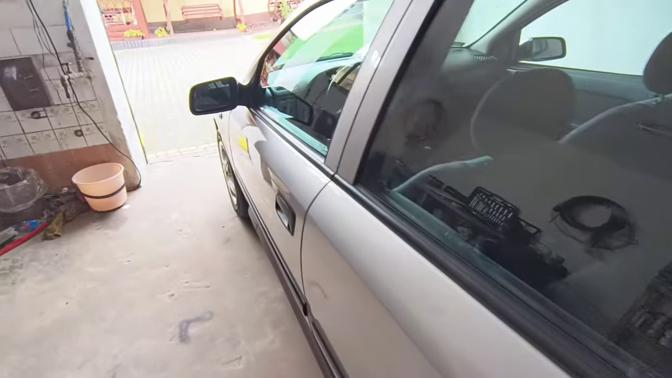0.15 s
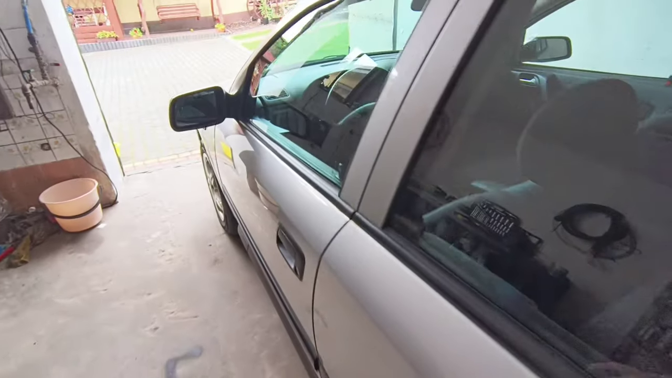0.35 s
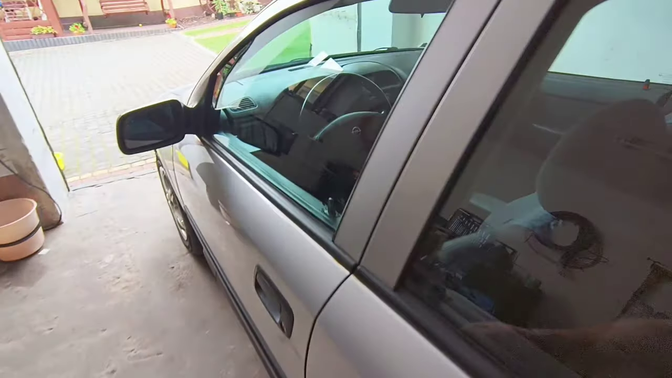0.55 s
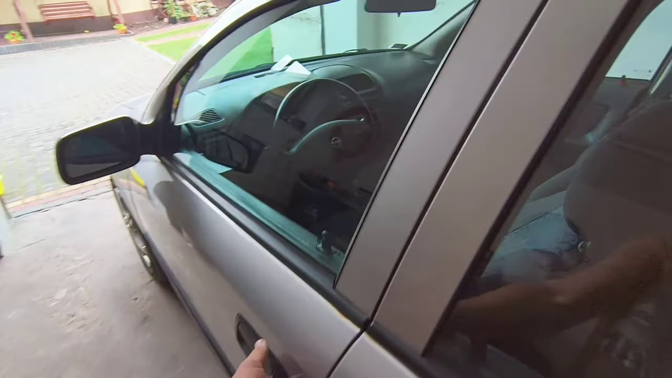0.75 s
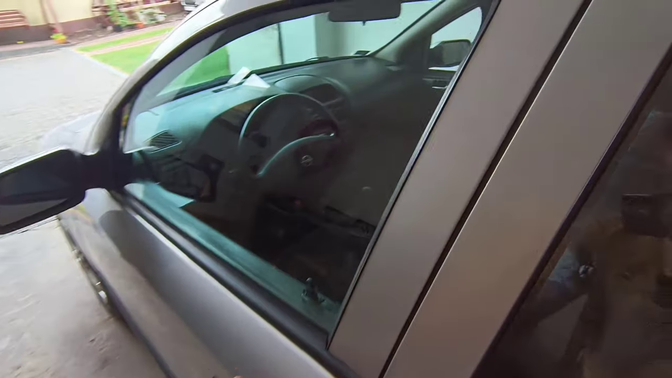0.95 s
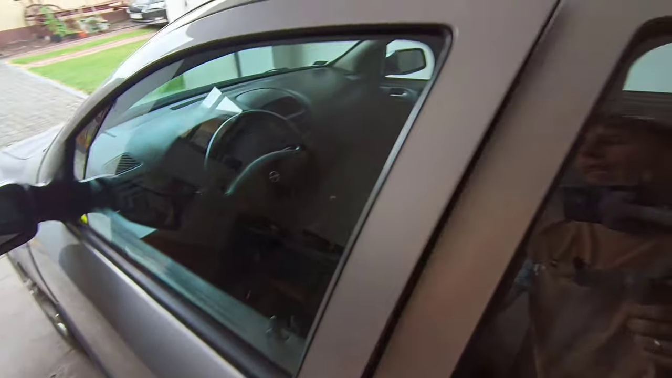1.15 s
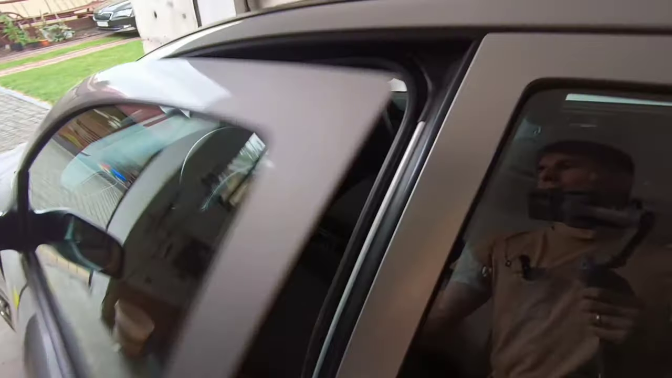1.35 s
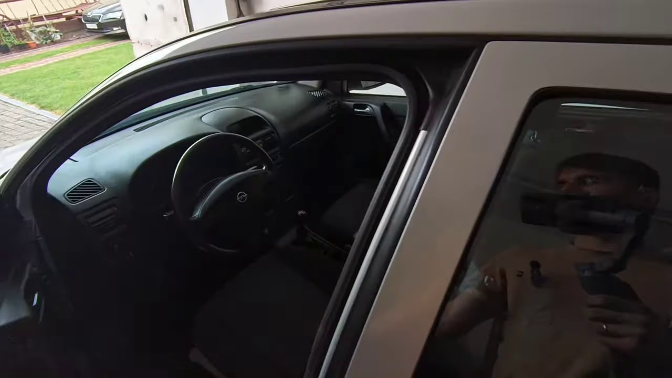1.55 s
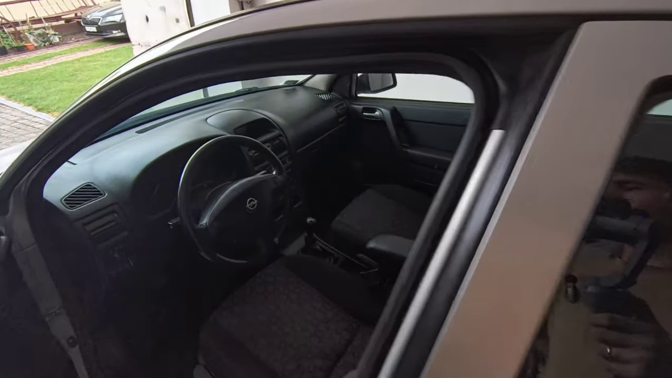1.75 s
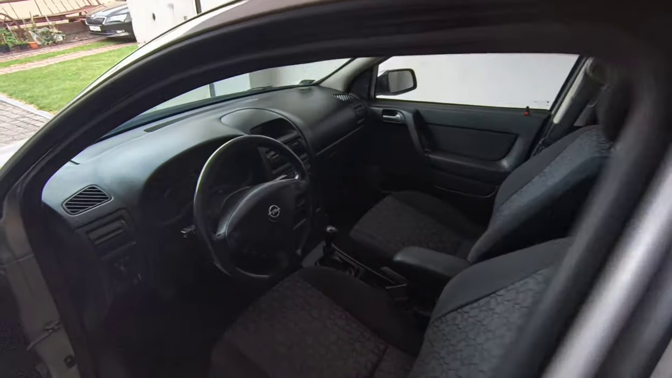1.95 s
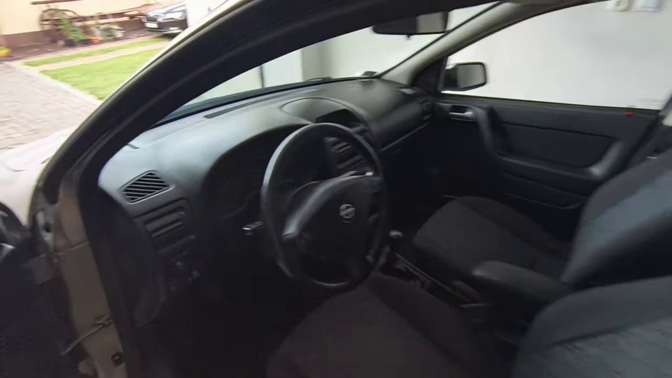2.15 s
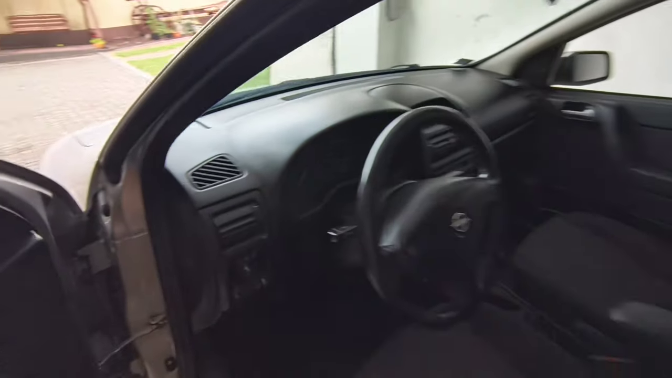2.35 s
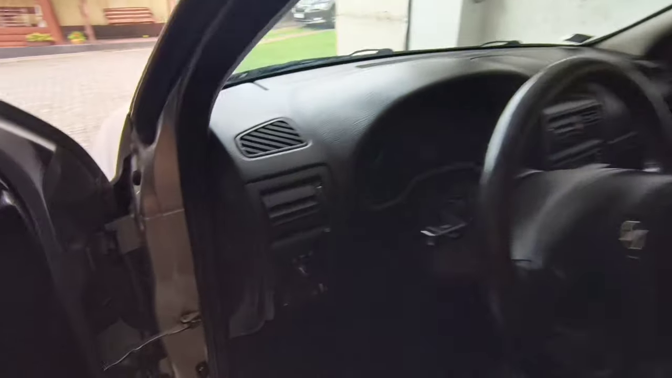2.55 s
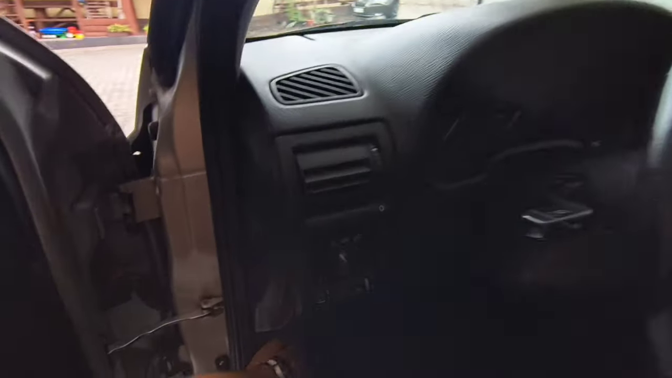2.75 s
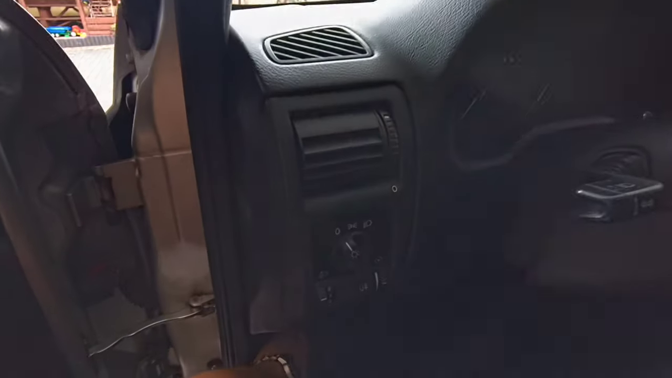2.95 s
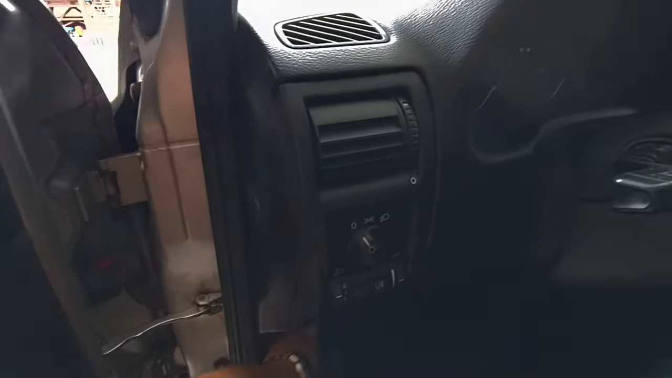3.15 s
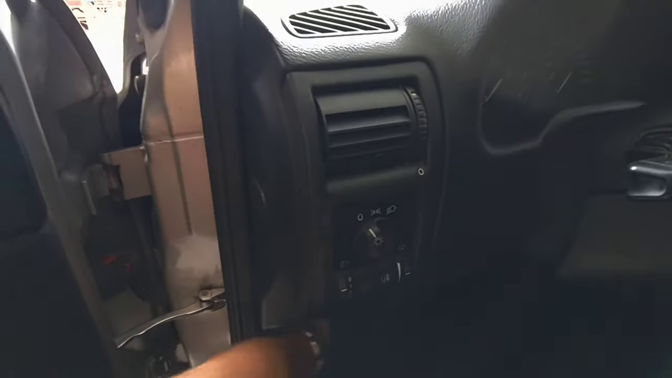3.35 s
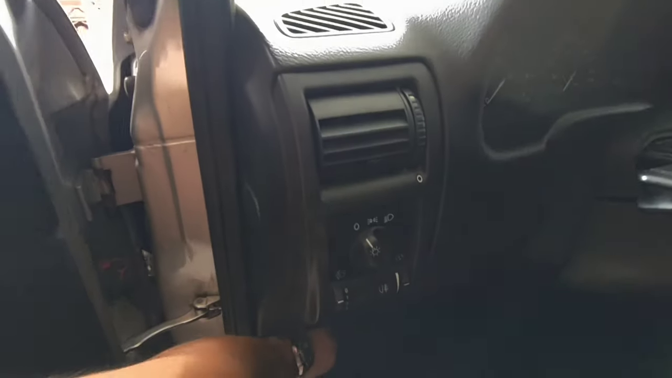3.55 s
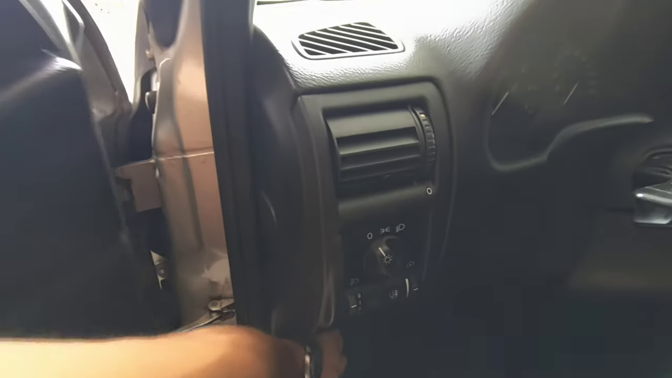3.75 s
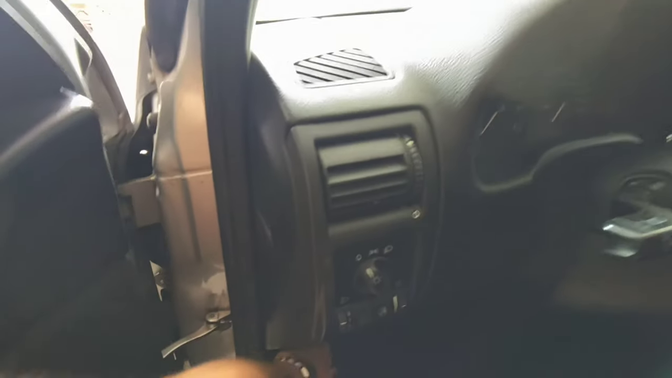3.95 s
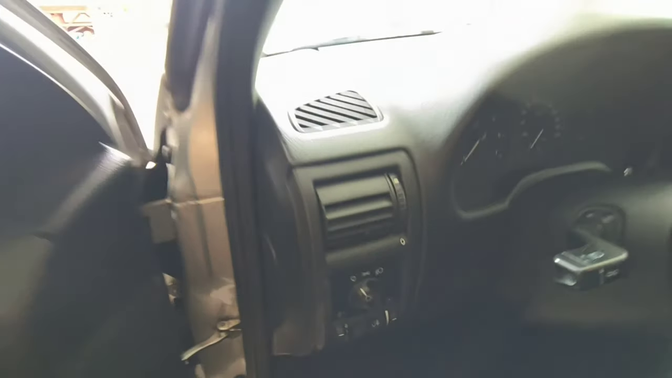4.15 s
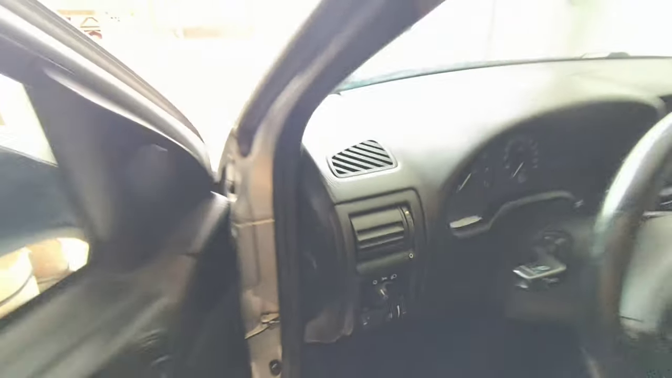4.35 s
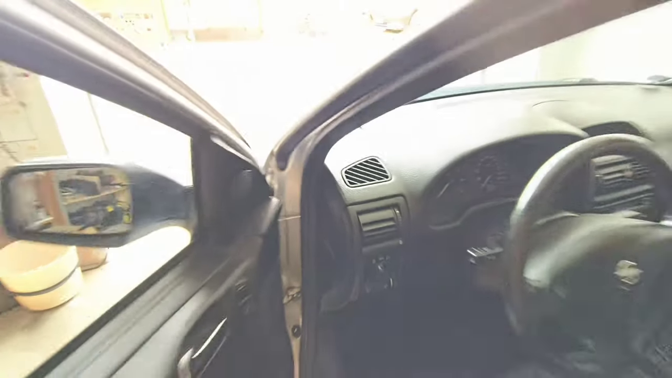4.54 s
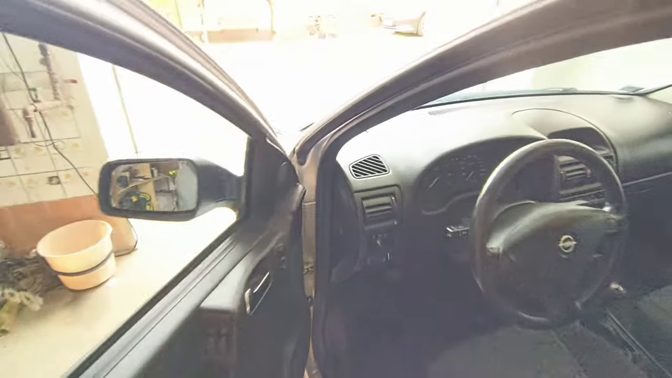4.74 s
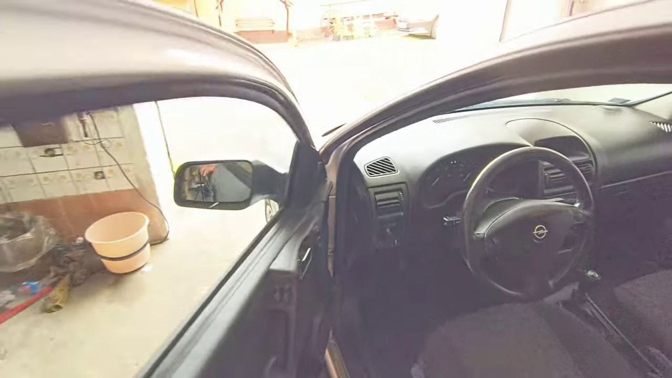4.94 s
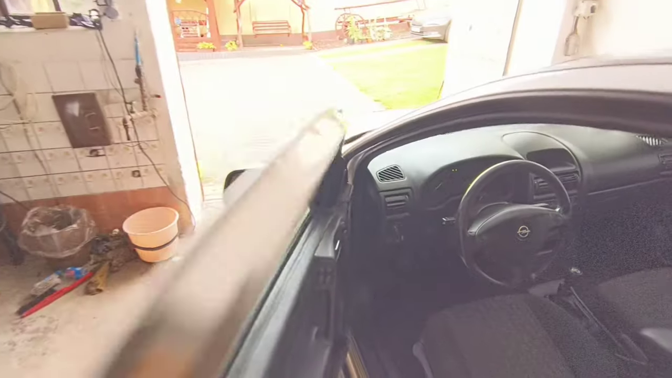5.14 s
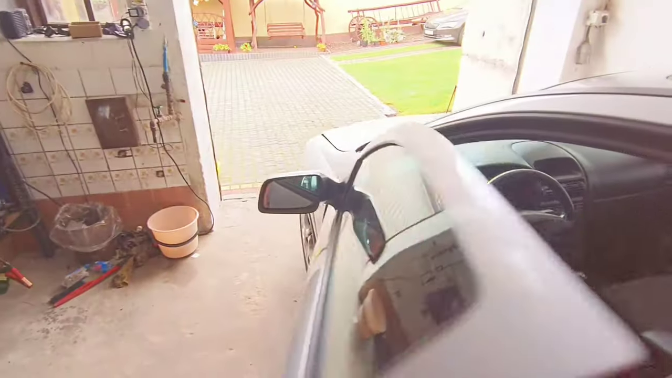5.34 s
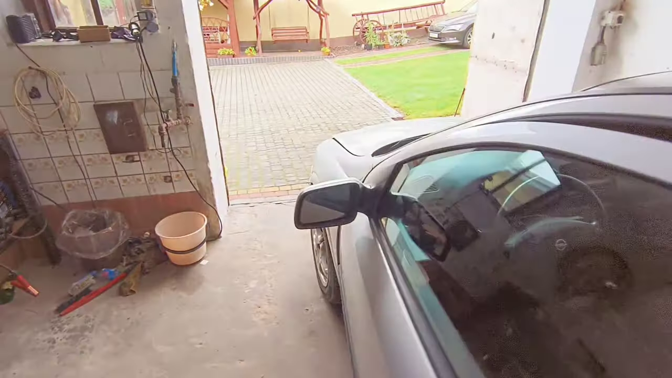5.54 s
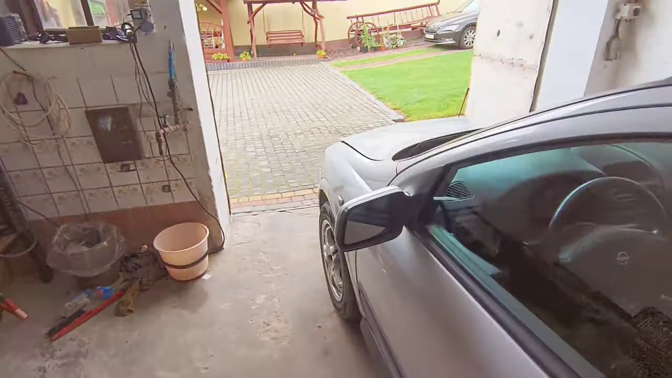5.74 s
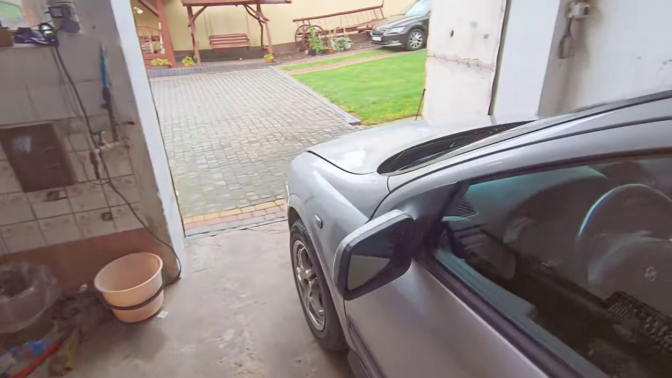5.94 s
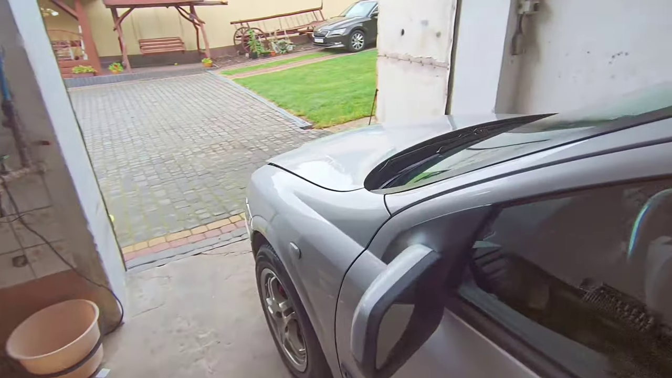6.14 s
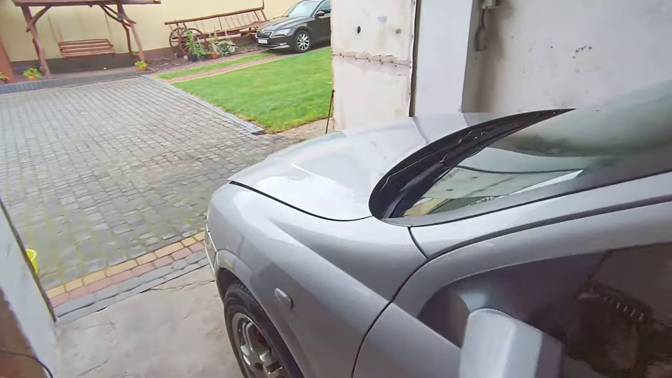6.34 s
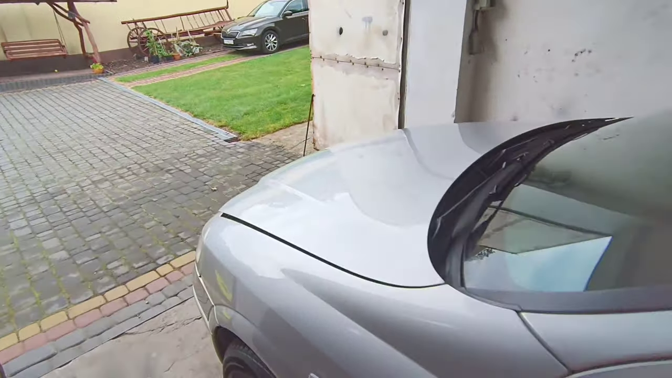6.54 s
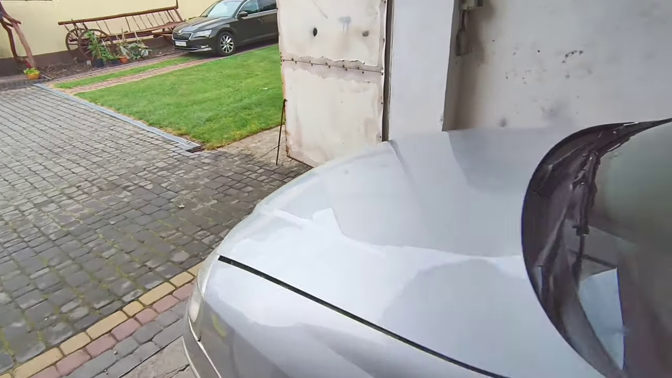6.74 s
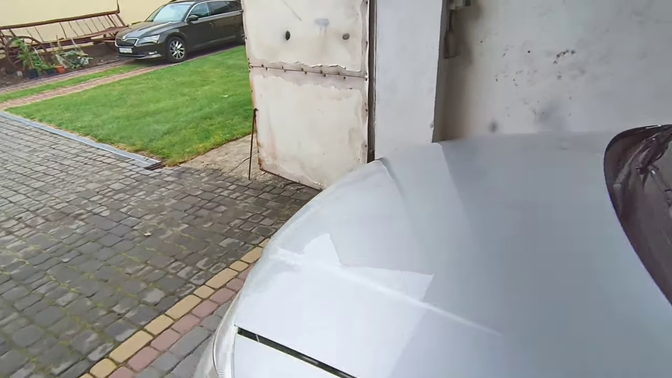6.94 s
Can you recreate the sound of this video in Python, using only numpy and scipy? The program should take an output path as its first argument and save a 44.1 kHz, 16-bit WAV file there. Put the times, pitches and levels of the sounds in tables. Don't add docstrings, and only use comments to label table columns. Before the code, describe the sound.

Close handheld sound of a car door opening, a groaning bonnet release lever, a heavy metallic pop, cloth rustle, and one hard door slam.

```python
import sys
import numpy as np
from scipy import signal
from scipy.io import wavfile

SR = 44100
rng = np.random.default_rng(int(sys.argv[2]) if len(sys.argv) > 2 else 0)


def log_audio(samples):
    frames = np.atleast_2d(samples).T
    limited = np.clip(frames, -1, 1)
    pcm = np.round(limited * 32767).astype(np.int16)
    wavfile.write(sys.argv[1], SR, pcm)


def level_to_linear(level):
    exponent = np.asarray(level, float) / 20
    return 10 ** exponent


N = 308341
TIME = np.arange(N) / SR
EDGES = np.minimum(22 * 2 ** np.arange(0, 9.8, .4), 17000)
CENTRES = np.sqrt(EDGES[1:] * EDGES[:-1])


def unit_rms(x):
    return x / np.sqrt(np.mean(x ** 2) + 1e-20)


def in_time(rows):
    s, *columns = np.transpose(rows)
    return [np.interp(TIME, s, column) for column in columns]


def at_hz(points, hz):
    points = np.array(points)
    return np.interp(np.log(hz), np.log(points[:, 0]), points[:, 1])


def band(x, k):
    return signal.sosfilt(signal.butter(2, EDGES[k:k + 2], "band", fs=SR, output="sos"), x)


def drift(rate_hz):
    r = np.exp(-20 * np.pi * rate_hz / SR)
    slow = signal.lfilter([1], [1, -2 * r, r * r], rng.standard_normal(N // 10 + 4002))[4000:]
    return np.interp(np.arange(N) / 10, np.arange(len(slow)), unit_rms(slow))


def dying(t60):
    t60 = max(t60, .004)
    return level_to_linear(-60 * np.arange(int(t60 * SR * 4 / 3)) / (t60 * SR))


def mix_in(track, sound, at):
    track[at:at + len(sound)] += sound[:N - at]


def coloured(spectrum, patchy_db, flicker_hz):
    white, together = rng.standard_normal((2, N)), drift(flicker_hz)
    out = np.zeros(N)
    for k, hz in enumerate(CENTRES):
        if spectrum[0][0] < hz < spectrum[-1][0]:
            level_db = at_hz(spectrum, hz) + patchy_db * (together + drift(19))
            out += level_to_linear(level_db) * band(white[k % 2], k)
    return unit_rms(out)


def swells(rows, still_db):
    power = level_to_linear(still_db) ** 2
    for s, peak_db, swell, fade in rows:
        away = np.where(TIME < s, (s - TIME) / max(swell, .01), (TIME - s) / max(fade, .01))
        power = power + level_to_linear(peak_db - 22.5 * np.minimum(away, 8)) ** 2
    return np.sqrt(power)


def friction(rows, slips_per_s, width_hz):
    hz, level_db = in_time(rows)
    slips = (rng.random(N) < slips_per_s / SR) * rng.standard_normal(N)
    r = np.exp(-np.pi * width_hz / SR)
    turn = np.exp(2j * np.pi * np.cumsum(hz) / SR)
    ring = np.real(turn * signal.lfilter([1], [1, -2 * r, r * r], slips / turn))
    to_nearer_end = np.minimum(TIME - rows[0][0], rows[-1][0] - TIME)
    sounding = np.clip(to_nearer_end / 0.018, 0, 1)
    return level_to_linear(level_db - 2.0) * sounding * unit_rms(ring)


def panels(blows):
    out = np.zeros(N)
    for s, blow_db, shaking, modes in blows:
        burst = dying(shaking)[:SR // 2]
        white = rng.standard_normal((len(modes), SR // 2))[:, :len(burst)]
        rattle = white * burst / np.sqrt(shaking * 10)
        for shake, (hz, mode_db, t60) in zip(rattle, modes):
            force = np.full(SR * 3 // 2, 1e-18)
            quick = hz / (hz + 95.0)
            force[:len(shake)] += quick * shake
            force[0] += 29.0 * (1 - quick) ** 2
            r, w = level_to_linear(-60 / (min(t60, 1.5) * SR)), 2 * np.pi * hz / SR
            ring = signal.lfilter([0, np.sin(w)], [1, -2 * r * np.cos(w), r * r], force)
            mix_in(out, level_to_linear(blow_db + mode_db) * ring, round(s * SR))
    return out


# (frequency [Hz], level [dB])
FLOOR = [(15, -30), (25, -1), (660, -12.5), (1020, -19), (1400, -23), (5280, -33.5), (10400, -25.5),
         (16000, -57)]


def quiet_garage():
    return level_to_linear(-58) * coloured(FLOOR, 0.58, 0.64)


# (frequency [Hz], T60 [s])
GARAGE_T60 = [(60, 0.71), (300, 0.41), (1500, 0.37), (6000, 0.43), (15000, 0.3)]


def garage_echoes(x):
    t, white = np.arange(SR) / SR, rng.standard_normal(SR)
    echoes = np.zeros(SR)
    for k, hz in enumerate(CENTRES):
        t60 = max(at_hz(GARAGE_T60, hz), .05)
        echoes += band(white, k) * level_to_linear(-3.0 * np.log2(1 + hz / 1000) - 60 * t / t60)
    echoes *= np.clip(t / 0.0084, 0, 1)
    return signal.fftconvolve(x, echoes / np.sqrt(np.sum(echoes ** 2)))[:N]


# (frequency [Hz], level [dB per Hz])
RUMBLE = [(20, 8), (35, -1), (80, -1.5), (160, -15.5), (300, -34.5), (600, -53)]
# (time [s], level [dB], swell [s], fade [s])
HANDLING = [
    (.33, -51, .4, 0.4),
    (.93, -50, 0.18, 0.6),
    (1.3, -35, 0.45, 0.27),
    (2.85, -36, 0.2, 0.32),
    (4.05, -39.5, 0.49, 0.59),
    (4.44, -39, 0.14, 0.18),
    (4.85, -45, 0.52, 0.57),
    (5.95, -40.5, 0.23, 0.97),
    (6.45, -51, .4, 0.14),
]


def microphone_grip():
    return swells(HANDLING, -61) * coloured(RUMBLE, 1.36, 9.0)


# (frequency [Hz], level [dB per Hz])
FABRIC = [(6000, -30), (9000, -17), (12000, -3.5), (14300, 4), (17000, -7)]
# (time [s], level [dB], swell [s], fade [s])
SLIDES = [(5.2, -44, .3, 0.48), (5.1, -45.5, 0.75, .6), (4.86, -41.5, .6, 0.83), (4.95, -43.5, .5, .7),
          (5.4, -56.5, .5, 0.31), (7.1, -48, .3, 0.15), (0.93, -48, .3, 0.22), (8.3, -50, 0.25, .3),
          (1.66, -45, .08, 0.11)]


def sliding_fabric():
    return swells(SLIDES, -90.0) * coloured(FABRIC, .6, 9.0)


# (frequency [Hz], level [dB per Hz])
SHUFFLE = [(150, -10), (300, -1), (600, -11.5), (1300, 2), (2500, -6), (4000, -7.5), (8000, -16)]
CLOTH = [(2000, -4), (4000, -10.5), (7000, -12), (10000, -5), (13000, -8), (16500, 2)]
# (time [s], level [dB], swell [s], fade [s], cloth share [dB])
GESTURES = [(.33, -60.5, 0.56, 0.35, 6), (.74, -52.5, 0.16, 0.35, -30), (.93, -52, 0.34, 0.24, 3),
            (1.3, -47.5, 0.22, 0.13, -7), (1.67, -37, 0.056, 0.11, 3), (1.93, -53, 0.82, 0.16, -7),
            (2.45, -61.5, 1, 0.55, 1.5), (2.9, -52, 0.43, 0.26, 3.5), (3.45, -49.5, 0.35, 0.8, -2.5),
            (3.93, -29.5, 0.14, 0.14, 1), (4.439, -61.5, 0.51, 0.26, 8), (4.75, -56, 0.6, .4, 9),
            (4.959, -43.5, 0.16, 0.15, 10), (5.45, -51.5, 0.51, 0.15, 4), (5.86, -27.5, 0.041, 0.13, -17),
            (6.39, -47, 0.3, 0.31, 4), (6.99, -49, 0.44, 0.36, 2)]


def moving_person():
    shuffle = swells([row[:-1] for row in GESTURES], -62.5) * coloured(SHUFFLE, 2.38, 4.4)
    sleeve = [(s, peak_db + cloth_db, swell, fade) for s, peak_db, swell, fade, cloth_db in GESTURES]
    rustle = swells(sleeve, -75) * coloured(CLOTH, 1.2, 40.)
    crackle = level_to_linear(3 * drift(107) - 2.0)
    return shuffle * crackle + rustle


# (frequency [Hz], level [dB], T60 [s])
CABIN = [(13.16, -7.5, 1.8), (34.8, -5, 1.38), (78.5, -11, 0.54), (150, -15, 0.4)]
ENGINE_BAY = [(58.4, -13, 0.93), (87.9, 3, 0.79)]
CABIN_HIGH = [(157, 3.5, 0.74), (74, -16, .3)]
BONNET_LOW = [(91.9, -2, 0.42), (118, -6, .2), (165, -2, .3), (193, 4, 0.45), (272.7, -6, 0.28),
              (360, -7, 0.18)]
SEAT = [(84, -7.5, 0.079), (136, -9, 0.1)]
# (time [s], level [dB], shaking T60 [s], cavity)
BOOMS = [
    (5.845, -33, 0.056, CABIN),
    (3.92, -29.5, 0.052, ENGINE_BAY),
]
# (time [s], level [dB], shaking T60 [s], panel)
REBOUNDS = [
    (3.91, -33, .1, BONNET_LOW),
    (4.005, -35.5, 0.082, BONNET_LOW),
    (5.846, -30, .03, CABIN_HIGH),
    (6.039, -28.5, 0.016, SEAT),
]


def hollow_booms():
    return panels(BOOMS) + panels(REBOUNDS)


# (frequency [Hz], level [dB], T60 [s])
CLIP_HIGH = [(2400, -5, 0.0083), (3300, -0.5, 0.0083), (4600, -3, .008), (7000, -10, 0.005)]
CLIP_LOW = [(1300, -1, .015), (1890, -1, 0.0099), (2500, -7.5, 0.0096)]
# (time [s], level [dB], shaking T60 [s], clip)
TICKS = [(1.4025, -66, .012, CLIP_LOW), (1.415, -60, .02, CLIP_LOW), (1.4755, -57, .012, CLIP_HIGH),
         (1.487, -56, .012, CLIP_LOW), (1.525, -60, .012, CLIP_HIGH), (1.931, -66, .012, CLIP_HIGH),
         (3.055, -62, .015, CLIP_LOW), (3.281, -62, .015, CLIP_LOW), (4.094, -62, .012, CLIP_HIGH),
         (4.957, -54, .015, CLIP_HIGH), (3.596, -56, .015, CLIP_LOW)]


def clip_ticks():
    return panels(TICKS)


# (time [s], resonance [Hz], level [dB])
HANDLE_SCRAPE = [(1.05, 550, -47), (1.082, 517, -45), (1.112, 481, -29), (1.146, 493, -34),
                 (1.152, 494, -20)]
HANDLE_GRIT = [(1.06, 4200, -71), (1.13, 4600, -39), (1.16, 4400, -58)]


def door_handle():
    return friction(HANDLE_SCRAPE, 2500., 1100.0) + friction(HANDLE_GRIT, 180., 2500.)


# (time [s], resonance [Hz], level [dB])
HINGE_SQUEAK = [(1.525, 4100, -50), (1.546, 4000, -55), (1.61, 3560, -48), (1.63, 3500, -18)]
HINGE_CREAK = [
    [(4.72, 774, -77), (4.756, 750, -51), (5.004, 706, -51), (5.062, 720, -47.5), (5.19, 725, -59),
     (5.22, 744, -94)],
    [(5.25, 750, -13), (5.264, 715, -55), (5.334, 730, -49), (5.38, 820, -49), (5.488, 754, -50),
     (5.56, 766, -64)],
]


def door_hinge():
    squeak = friction(HINGE_SQUEAK, 2200.0, 480.0)
    return squeak + sum(friction(rows, 2700.0, 130.0) for rows in HINGE_CREAK)


# (time [s], resonance [Hz], level [dB])
SEAL_SQUEEZE = [(5.735, 440, -66.5), (5.751, 462, -45.5), (5.803, 391, -30)]


def door_seal():
    return friction(SEAL_SQUEEZE, 4000., 500.0)


# (time [s], resonance [Hz], level [dB])
CABLE_RUB = [(3.47, 1400, -53), (3.52, 1300, -37), (3.58, 1350, -52), (3.62, 1500, -40), (3.68, 1600, -40),
             (3.72, 1500, -59)]
# (time [s], resonance [Hz], level [dB])
LEVER_GROAN = [(3.48, 365, -63), (3.516, 380, -46), (3.554, 364, -31), (3.638, 410, -25), (3.68, 408, -29),
               (3.74, 396, -61)]


def bonnet_lever():
    out = friction(CABLE_RUB, 3000., 810.0) + friction(LEVER_GROAN, 6000.0, 75.0)
    partials = [(.5, -7, 540., 62.), (1.5, -15, 5000., 70.), (2, -17.5, 5000., 70.)]
    for multiple, share_db, slips_per_s, width_hz in partials:
        glide = [(s, hz * multiple, db) for s, hz, db in LEVER_GROAN]
        out += level_to_linear(share_db) * friction(glide, slips_per_s, width_hz)
    return out


# (frequency [Hz], width [Hz], level [dB])
SHELL = [(162.7, 3.9, -11), (232.7, 37.5, 3.5), (303, 28, -4), (393, 43, 7), (453, 166, -6.5), (707, 94, 5),
         (931, 37, -8), (1200, 68, 5), (1395, 49, -1), (1592, 130, 6.5), (2020, 120, -12), (2510, 85, 5.5),
         (3560, 240, -13.5), (12400, 2300, 4.5)]


def shell(x):
    out = level_to_linear(-2) * x
    for k, (hz, width, peak_db) in enumerate(SHELL):
        r = np.exp(-np.pi * width / SR)
        top = np.array([1, 0, -1]) * (1 - r * r) / 2 * (-1) ** k
        out = out + level_to_linear(peak_db) * signal.lfilter(top, [1, -2 * r * np.cos(2 * np.pi * hz / SR), r * r], x)
    return out


# (time [s], body level [dB], bright edge level [dB], ring T60 at 1 kHz [s])
SCUFFS = [(.364, -39.5, -44.5, .44), (.921, -57, -36, .22), (4.722, -57, -54, .16),
          (4.8394, -47, -47, 0.19), (4.883, -32, -39, 0.49), (6.2821, -48.5, -39.5, 0.94),
          (6.759, -40, -51, 0.5), (6.9596, -48, -33.5, .18)]
SNAPS = [(.2334, -45.5, -51, 0.66), (.716, -44.5, -43, 1), (.8015, -39.5, -43, 0.59),
         (.862, -53, -35, 0.52), (1.4, -45, -29, 0.039), (1.4125, -34.5, -77, 0.38),
         (1.4757, -42, -31, 0.062), (2.0404, -40.5, -50, 0.09), (2.105, -46, -37, 0.049),
         (2.2434, -38, -46, 0.78), (2.3738, -42.5, -31, 0.074), (2.7155, -12.5, -15, 0.11),
         (2.9344, -41, -13.5, 0.095), (3.2754, -39.5, -72, 0.046), (3.6172, -31, -27.5, 0.29),
         (3.67, -25.5, -11.5, 0.063), (3.7995, -14.5, -17.5, 0.22), (4.1074, -14.5, -21.5, 0.092),
         (4.6453, -38.5, -29, 0.18), (4.953, -42, -14.5, 0.12), (6.5054, -34.5, -41, 0.3),
         (6.856, -45.5, -41, 0.34)]
THUMPS = [(1.194, -13.5, -28, 0.25), (1.28, -37, -26.5, 0.046), (1.524, -38, -42, 0.15),
          (3.2271, -37, -40, 0.18), (3.676, -22.5, -48, 0.1), (4.404, -25.5, -29.5, 0.16),
          (5.2878, -23, -27, 0.09), (5.691, -40.5, -37, 0.35), (5.7295, -27.5, -28, 0.2)]
KNOCKS_HOLLOW = [(1.061, -27.5, -46, 0.29), (1.0775, -31, -41, 0.62), (1.248, -21.5, -35, 0.15),
                 (1.8058, -19.5, -46, 0.15), (2.1745, -25, -39.5, 0.15), (2.5894, -23, -51, 0.099),
                 (2.692, -3, -46, 0.07), (2.738, -27, -34, 0.3), (3.109, -34, -43, 0.042),
                 (3.3408, -27, -20.5, .13), (3.593, -27.5, -41, 0.35), (3.812, -12, -50, 0.18),
                 (5.3627, -32, -33, 0.35), (5.7734, -19, -48, 0.16), (5.7886, -17.5, -29, 0.23),
                 (5.8162, -4.5, 6, 0.11)]
CLUNKS = [(1.1158, -27, -39, .15), (1.1513, -16, -22, .3), (1.501, -33, -31, 0.12),
          (1.614, -30, -14.5, 0.27), (1.666, -10.5, -16.5, 0.16), (1.6774, -19, -25.5, 0.44),
          (2.6946, -9, -3, 0.13), (2.8545, -24.5, -23.5, 0.14), (3.0465, -41, -47, 0.12),
          (3.465, -28, -36.5, 0.22), (3.8775, -1.5, -5.5, 0.34), (5.26, -34, -52, 0.14),
          (5.8045, -10, -7.5, 0.24), (5.8394, -11.5, -11.5, 0.45)]
# (contacts, bass level [dB], low-middle level [dB], middle level [dB])
CONTACTS = [
    (CLUNKS, 1.75, -1.8, -.3),
    (KNOCKS_HOLLOW, -14.5, 0.36, -18),
    (THUMPS, .3, -20.5, -16.5),
    (SNAPS, -15, -5, 0.28),
    (SCUFFS, -16, -15, 0.28),
]


def knocks():
    out = np.zeros(N)
    white = rng.standard_normal((2, N)) * level_to_linear(2.4 * drift(200) - 0.84)
    rows = [(*row, *body) for table, *body in CONTACTS for row in table]
    for k, hz in enumerate(CENTRES):
        shake = np.full(N, 1e-18)
        for s, body_db, treble_db, t60, *tone_db in rows:
            bass_db, low_db, middle_db = body_db + np.array(tone_db)
            colour = [(40, bass_db - 17.0), (130, bass_db + 20.5), (550, low_db + 18),
                      (2500, middle_db + 10), (8000, treble_db + 4.5), (14000, treble_db + 8.5)]
            fall = level_to_linear(at_hz(colour, hz) - 7.5) * dying(t60 * (hz / 1000) ** -.3)
            build_s = (0.00072 + 0.0064 * t60) * (0.72 + hz / 8900.0)
            fall *= 1 - np.exp(-np.arange(len(fall)) / (SR * build_s))
            mix_in(shake, fall, round(s * SR))
        out += band(shake * white[k % 2], k)
    return out


# (frequency [Hz], level [dB], T60 [s])
CATCH = [(393, -4, 0.13), (860, -11, 0.083), (974, -1.5, 0.089), (1212, -2.5, 0.089), (1500, -11, .05),
         (1730, -1.5, 0.067), (1860, -8.5, .06), (2750, -16, .06), (3300, -26, .05)]
PAWL = [(390, -8, .1), (950, -34, 0.037), (1290, -20, .06), (1500, -9, 0.072), (1730, 0, 0.017),
        (1920, -3.5, 0.023), (2460, -12, 0.027), (2904, -8.5, 0.047), (3800, -14, 0.055)]
SILL = [(169, -2, 0.092), (201.4, 0.5, 0.13), (258, 0.5, 0.087), (307, -12, 0.13)]
BONNET_SKIN = [(325, 9, 0.065), (525, 8, 0.055), (724, -17, 0.27), (950, -5.5, 0.087), (1170, -12, .12),
               (1631, -1, .12), (1970, -9, .1), (2470, -4, 0.12), (2900, -22, .3)]
DOOR_SKIN = [(76.8, -6, .15), (186, 3.5, .08), (231, 3.5, 0.06), (310, 4.5, 0.095), (484, 1, 0.05),
             (637, -14, .1), (1204, -15, 0.11), (1638, -11.5, 0.085), (2160, -14, 0.064)]
STRAP = [(471, -7, 0.07), (884, 3.5, 0.034), (1180, -1.5, 0.034), (1473, -3, 0.05), (2680, -19, 0.032)]
# (time [s], level [dB], shaking T60 [s], panel)
RECOILS = [(5.8405, -25.5, 0.042, DOOR_SKIN), (5.862, -38.5, 0.034, DOOR_SKIN),
           (5.877, -38, 0.025, DOOR_SKIN), (6.031, -49.5, 0.051, SILL), (3.886, -35, 0.074, BONNET_SKIN),
           (3.912, -52, 0.12, BONNET_SKIN), (3.94, -48, 0.071, BONNET_SKIN), (3.82, -49, .05, CATCH),
           (3.855, -56.5, 0.032, CATCH), (1.808, -49, .05, STRAP), (1.7, -64, .05, STRAP),
           (1.68, -43, .1, STRAP), (1.745, -52.5, 0.067, STRAP), (1.165, -53, 0.073, STRAP),
           (1.185, -50, 0.084, STRAP), (1.105, -58, 0.11, STRAP), (1.25, -56, 0.067, STRAP)]
# (time [s], level [dB], shaking T60 [s], panel)
TEETH = [
    (3.593, -57, .03, PAWL),
    (3.647, -57, .03, PAWL),
    (3.7, -59, .03, PAWL),
]


def recoils():
    return -panels(RECOILS + TEETH)


# (frequency [Hz], level [dB], T60 [s])
LATCH = [(70.4, -10.5, 0.31), (102, -1, 0.22), (158, 2.5, 0.11), (221, -2.5, 0.16), (288, 6.5, 0.12),
         (446, -0.5, 0.11), (535, -14.5, 0.17), (753, -14, 0.098), (953, -12.5, 0.17)]
DOOR_STOP = [(96.6, -2.5, 0.48), (155.6, -4, 0.34), (241.6, 2, 0.25), (308, -11.5, 0.41), (387, -20, 0.11),
             (576, -27, 0.31), (630, -5, 0.22), (904, -21, 0.32)]
LEVER = [(155, -12, 0.54), (320, -22, .15), (393, 14.5, 0.027), (1350, 2, 0.053), (1470, 2.5, 0.056),
         (2780, -7, 0.046)]
CABLE = [(392, -13.5, 0.17), (970, -25, 0.055), (1250, -9.5, 0.078), (1470, -4.5, 0.12), (1526, 1.5, 0.031),
         (1775, -2.5, 0.026), (2100, -11, 0.024), (2640, -18, 0.075), (2860, -3, 0.052)]
BONNET = [(79, 2.5, 0.47), (93, 4, 0.65), (166.5, 4.5, 0.31), (193.3, 3.5, 0.32), (261.2, 0, 0.44),
          (354, 8, 0.075), (391, 12, 0.11), (487, -10, 0.23), (927, 7, 0.29)]
DOOR = [(32.4, -19, 0.62), (66, 4.5, 0.3), (80.3, 7, 0.4), (112, -22, 0.33), (163, -4, 0.1),
        (228, 3.5, 0.13), (286, -1, 0.24), (401, 10, 0.098), (510, -12, 0.058), (1058, -13.5, 0.28),
        (1585, -27, 0.16)]
GLASS_CLIP = [(12700, -9, .05), (12660, 16.5, 0.08)]
TRIM = [(1040, 0, 0.015), (2890, 0, 0.02)]
# (time [s], level [dB], shaking T60 [s], panel)
BLOWS = [(1.153, -32.5, 0.13, LATCH), (1.477, -75, 0.016, TRIM), (1.488, -52.5, 1, SILL),
         (1.525, -74, 0.02, TRIM), (2.188, -68, 0.018, TRIM), (1.678, -37, 0.095, DOOR_STOP),
         (2.695, -35, 0.056, LEVER), (2.856, -59, 0.044, CABLE), (3.466, -45.5, 0.047, CABLE),
         (3.61, -54, 0.13, PAWL), (3.67, -47.5, 0.02, PAWL), (3.801, -41.5, 0.19, CATCH),
         (3.878, -32.5, 0.29, BONNET), (4.107, -61, 0.076, CABLE), (4.402, -34.5, 0.11, SEAT),
         (4.45, -41.5, 0.027, SEAT), (4.581, -73, 0.045, TRIM), (5.262, -51, 0.28, SILL),
         (5.515, -65, 0.039, TRIM), (5.806, -30.5, 0.18, DOOR), (5.817, -48, 0.12, GLASS_CLIP),
         (5.846, -34.5, 0.15, DOOR_STOP)]


def heavy_blows():
    return panels(BLOWS)


def scene():
    car = shell(knocks()) + heavy_blows() + recoils() + clip_ticks()
    car += door_hinge() + bonnet_lever() + door_handle() + door_seal()
    person = microphone_grip() + moving_person() + sliding_fabric()
    return (car + level_to_linear(-18.5) * garage_echoes(car) + person + quiet_garage() + hollow_booms())[None]


def roll_off(x):
    return signal.sosfilt(signal.butter(12, 16500, fs=SR, output="sos"), x)


def record(dry):
    over_db = np.maximum(20 * np.log10(np.abs(dry) + 1e-9) + 3, 0)
    letting_go = 117.0 * TIME
    held_db = np.maximum(np.maximum.accumulate(over_db + letting_go, axis=1) - letting_go, 0)
    held_db = signal.lfilter([.01], [1, -.99], held_db)
    mix = np.clip(dry * level_to_linear(-.8 * held_db), -.94, .94)
    mix = signal.sosfilt(signal.ellip(14, .5, 70, 15700, fs=SR, output="sos"), mix)
    return roll_off(mix)


dry = scene()
out = record(dry)
log_audio(out)
```